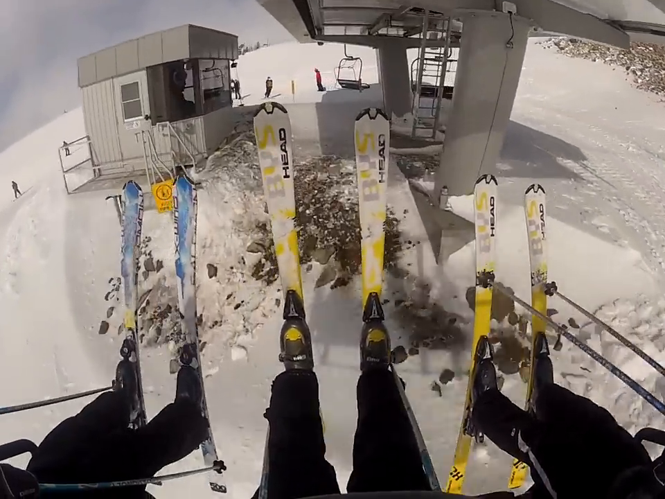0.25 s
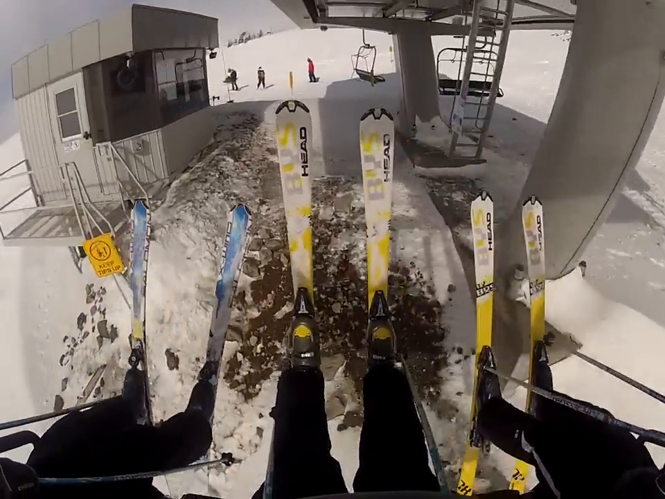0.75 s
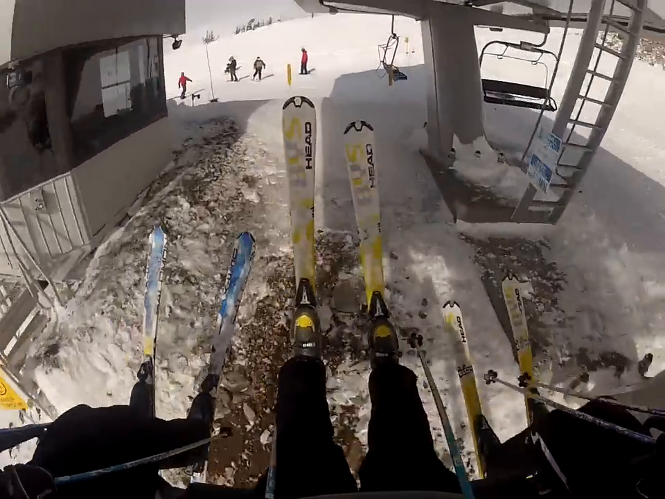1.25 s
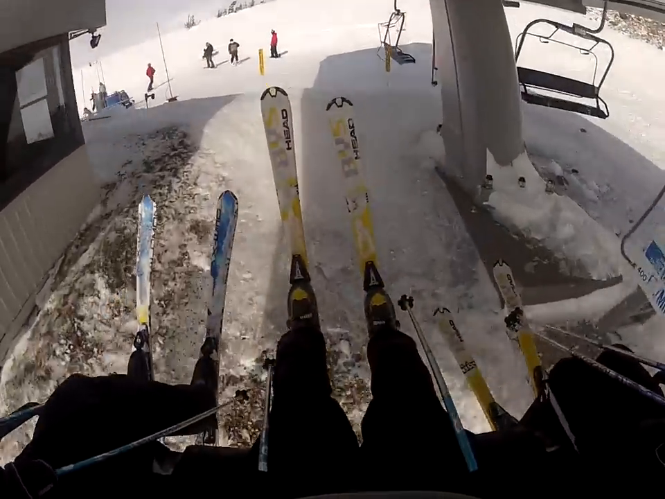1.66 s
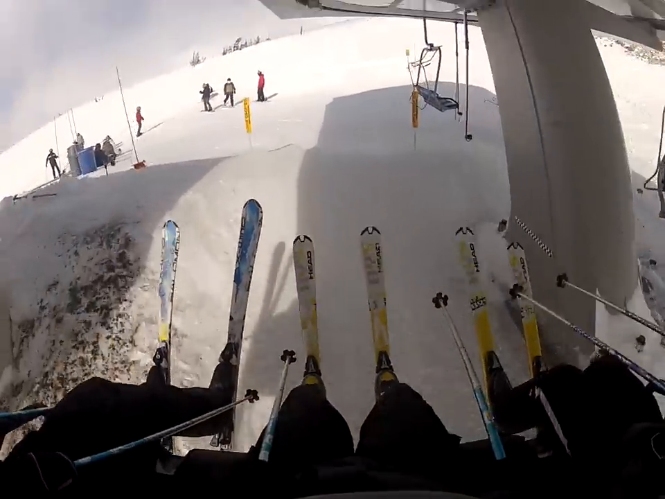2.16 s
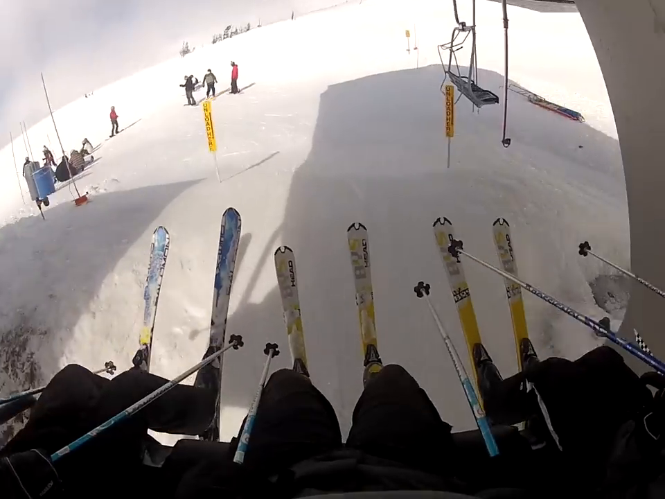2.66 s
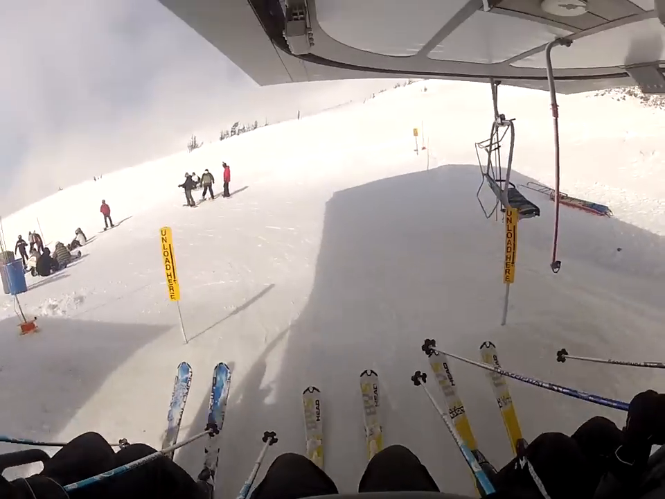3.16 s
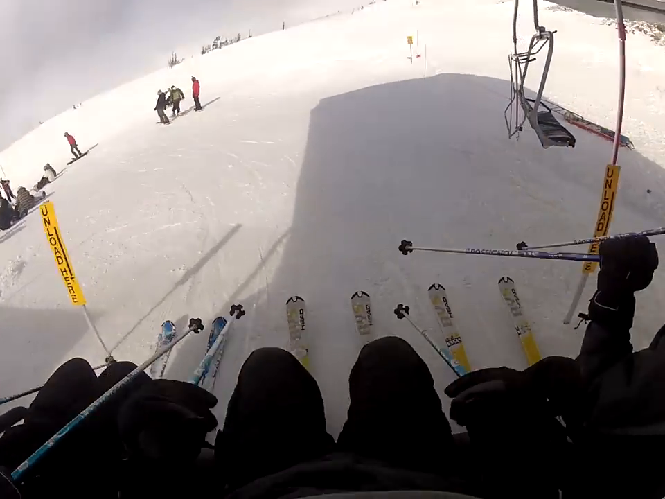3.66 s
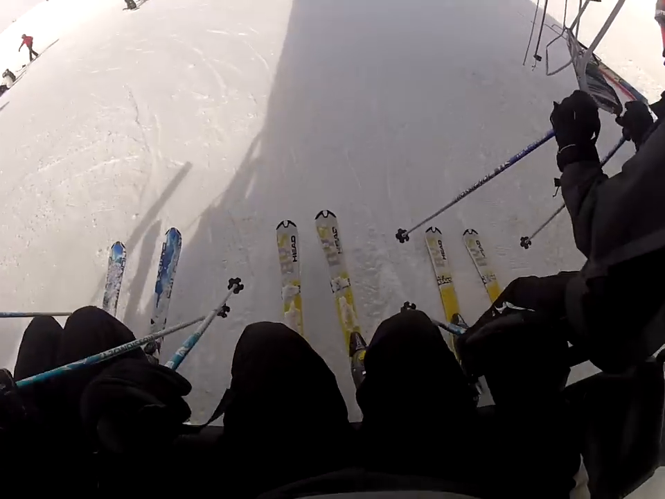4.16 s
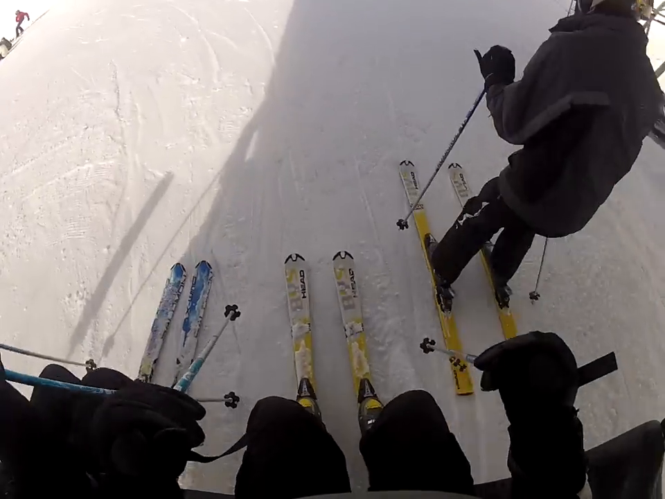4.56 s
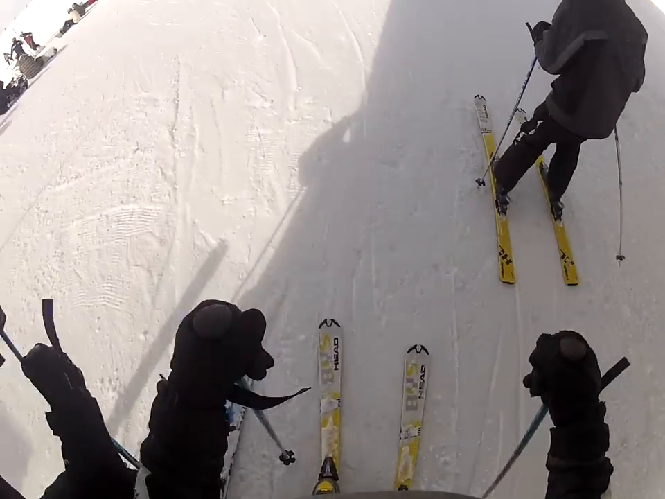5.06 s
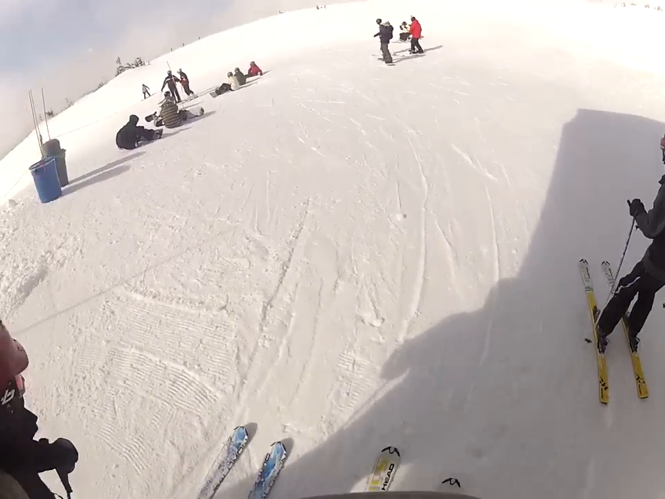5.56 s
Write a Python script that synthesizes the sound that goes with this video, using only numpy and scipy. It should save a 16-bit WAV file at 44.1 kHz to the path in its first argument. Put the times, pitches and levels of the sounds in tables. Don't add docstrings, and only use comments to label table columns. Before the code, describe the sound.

Heard from a rider's body camera in a closed case, a chairlift nears its top station. A low steady-pitched hum pulses over lumpy rumble; broadband machine roar opens abruptly before one second and stays. Brief cloth and pole scuffs follow. Sharp clacks with thumps come around 3.6 and 3.7 seconds, then at 5.0 and 5.3 as skis scrape snow. The sound is boxy, gritty and low-fidelity.

```python
import sys
import numpy as np
from scipy import signal
from scipy.io import wavfile
from scipy.ndimage import uniform_filter1d

SR = 44100
rng = np.random.default_rng(int(sys.argv[2]) if len(sys.argv) > 2 else 0)


def output_pcm(signal):
    pcm = np.clip(np.atleast_2d(signal).T, -1, 1) * 32767
    wavfile.write(sys.argv[1], SR, np.round(pcm).astype(np.int16))


def rack_gain(trim_db):
    fader = np.asarray(trim_db, float)
    return 10 ** (fader / 20)


N = 255780


def evened(x):
    return x / np.sqrt(np.mean(x ** 2) + 1e-20)


def steadied(x, window_s):
    size = round(window_s * SR)
    power = uniform_filter1d(uniform_filter1d(x ** 2, size), size)
    return x / np.sqrt(power + 1e-9)


def curve(rows, column=1):
    rows = np.vstack(rows)
    return np.interp(np.arange(N) / SR, rows[:, 0], rows[:, column])


def drift(rate_hz):
    size = max(int(SR / rate_hz), 2)
    return evened(uniform_filter1d(uniform_filter1d(rng.standard_normal(N), size), size))


def noise(colour, patchy_db, size=512):
    frames, hz = 4 * N // size + 5, np.fft.rfftfreq(size, 1 / SR)
    real, imag, patches = rng.standard_normal((frames, len(hz), 3)).T
    patches = uniform_filter1d(patches, size=4, axis=0)
    patches = evened(uniform_filter1d(patches, size=10, axis=1))
    f, db = np.transpose(colour)
    level_db = np.interp(np.log(hz + 1), np.log(f + 1), db, right=-90)[:, None]
    spectra = (real + 1j * imag) * rack_gain(level_db + patchy_db * patches)
    return evened(signal.istft(spectra, nperseg=size, noverlap=3 * size // 4)[1][:N])


def bandpass(x, band_hz):
    return signal.lfilter(*signal.butter(2, band_hz, "band", fs=SR), x)


def bump(t, centre_s, half_width_s):
    return np.exp(-((t - centre_s) / half_width_s) ** 2)


def add(mix, start_s, sound):
    part = mix[round(start_s * SR):][:len(sound)]
    part += sound[:len(part)]


# time in seconds, level in dB.
HUM = [(0.0, -32.5), (0.14, -32.5), (0.55, -25.5), (0.66, -33), (0.79, -26.5), (1.1, -25), (1.33, -21),
       (1.6, -26), (2.0, -30), (2.3, -31.5), (2.52, -21), (2.76, -26.5), (3.0, -18.5), (3.39, -19.5),
       (3.56, -14.5), (3.81, -24.5), (4.2, -32.5), (5.8, -30)]
# time in seconds, half width in seconds.
NODES = [(0.44, 0.057), (0.66, 0.043), (0.88, 0.08), (1.429, 0.17), (1.7, 0.13), (2.28, .07), (2.83, 0.11),
         (4.06, 0.067), (4.18, 0.064), (4.47, 0.058), (4.59, .08), (4.77, 0.064), (5.07, 0.078)]
# time in seconds, half width in seconds, peak in dB.
SWELLS = [
    [(4.36, .05, -35), (4.68, 0.017, -44), (5.26, 0.17, -27), (5.71, 0.2, -24.5)],
    [(0.18, 0.025, -46), (0.354, 0.037, -37), (0.75, 0.067, -44), (1.1, .1, -36), (1.4, 0.046, -46),
     (1.86, 0.09, -37), (2.45, 0.14, -37.5), (3.22, 0.16, -40), (3.48, .11, -34), (3.72, 0.047, -29),
     (4.1, .05, -43), (4.68, 0.33, -39.5), (5.19, 0.089, -36.5), (5.35, 0.039, -33), (5.65, 0.14, -40)],
    [(0.59, 0.13, -46), (0.93, 0.11, -43.5), (1.37, 0.035, -42), (1.57, 0.12, -34.5), (1.8, 0.045, -40),
     (2.16, 0.065, -43.5), (2.52, 0.13, -45), (3.03, 0.19, -43), (3.45, 0.18, -44.5), (4.1, .15, -51),
     (4.9, 0.08, -48.5), (5.55, 0.14, -51.5)],
]


def hum():
    mesh_hz, wander_hz, rest_db = 101.7, .35, [-75, -53, -57]
    t = np.arange(N) / SR
    turn = 2 * np.pi * np.cumsum(mesh_hz + wander_hz * drift(5.25)) / SR
    level = rack_gain(rest_db)[:, None] * np.ones(N)
    level[0] += rack_gain(curve(HUM))
    for s, half_width_s in NODES:
        level[0] *= np.tanh(abs(t - s) / half_width_s)
    for order_level, rows in zip(level, SWELLS):
        order_level += sum(rack_gain(db) * bump(t, s, half_width_s) for s, half_width_s, db in rows)
    out = np.zeros(N)
    for order, strength in enumerate(level, 1):
        flutter_db, sway_rad = .8 * drift(30), .08 * drift(20)
        out += np.sqrt(2) * strength * rack_gain(flutter_db) * np.sin(order * turn + sway_rad)
    return out


# time in seconds, level in dB, brightness of the upper part in dB.
RUMBLE = [(0.0, -41.5, 9.5), (0.33, -38.5, 0), (0.45, -38.5, 4.5), (0.5, -29, -6), (0.86, -31, -6.5),
          (1.02, -24.5, -7), (1.17, -23.5, -10.5), (1.23, -33, 1), (1.8, -32, -2), (2.27, -30.5, -3.5),
          (2.37, -39.5, 5), (2.5, -32, 0), (3.02, -36.5, 0), (3.2, -31, -5.5), (3.6, -30.5, -6.5),
          (4.0, -32.5, -6), (5.15, -37, -6.5), (5.8, -44.5, 4)]
# frequency in Hz, level in dB.
RUMBLE_LOW = [(15, -37), (30, 0.5), (55, 1.5), (80, 0.5), (110, -11.5), (150, -45), (250, -69)]
RUMBLE_HIGH = [(60, -21.5), (100, 4), (140, 1.5), (180, -3.5), (260, -9.5), (360, -17.5), (480, -26.5),
               (700, -41.5)]
# time and half width in seconds, lower and upper part in dB.
JOLTS = [(0.07, 0.052, -5, -15), (0.18, 0.02, 4, 1), (0.3, 0.034, 7, 2.5), (0.41, 0.029, 0, -2.5),
         (0.65, 0.032, 0.5, -1), (0.72, 0.04, -1, -6), (0.95, .06, -2.5, -0.5), (1.08, .07, -0.5, 5),
         (1.19, 0.031, 3.5, 5.5), (1.42, 0.16, 3.5, -0.5), (2.1, .12, -3, 0.5), (2.38, 0.033, 10, 2.5),
         (2.5, 0.1, -1, -1), (2.86, 0.046, -4, -4), (3.17, 0.035, 6.5, -1.5), (3.33, .05, -5, 0),
         (5.6, 0.077, 0, 1.5), (3.42, 0.031, -3, 1), (4.08, 0.029, -10, 0), (4.3, 0.052, -4, 1.5),
         (4.82, 0.084, 1, 4.5), (5.25, .03, -5, 2)]


def rumble():
    t = np.arange(N) / SR
    low_db, high_db = sum(np.outer(db, bump(t, s, half_width_s)) for s, half_width_s, *db in JOLTS)
    low_db = low_db + 1.25 * drift(36)
    high_db = high_db + curve(RUMBLE, 2) + 3.5 + 0.84 * drift(34)
    low = steadied(noise(RUMBLE_LOW, patchy_db=1.7, size=4096), 0.077) * rack_gain(low_db)
    high = steadied(noise(RUMBLE_HIGH, patchy_db=1.17, size=4096), 0.09) * rack_gain(high_db)
    return rack_gain(curve(RUMBLE)) * (low + high)


# frequency in Hz, level in dB.
FLOOR_COLOUR = [(210, -14), (350, -4), (408, -10), (461, -32), (589, -12.5), (950, -11), (1090, -46), (1520, -16.5),
                (1750, -29), (1960, -10.5), (2100, -12.5), (2310, -14), (2740, -19.5), (3500, -20.5), (4000, -18),
                (5200, -76), (8800, -120)]


def noise_floor():
    return rack_gain(-55.5) * noise(FLOOR_COLOUR, patchy_db=-1.2)


# frequency in Hz, width in Hz, level in dB.
CASE = [(934, 103, 11.5), (1384, 510, 10), (2084, 195, 14), (2950, 78, 10.5), (3440, 640, 9.5),
        (1085, 110, -17), (1730, 150, -28), (696, 150, -1.5)]


def through_case(x):
    out = x.copy()
    for hz, width_hz, db in CASE:
        out += (rack_gain(db) - 1) * signal.lfilter(*signal.iirpeak(hz, hz / width_hz, SR), x)
    return evened(out)


# time in seconds, level in dB.
ROAR = [(0.0, -63), (0.3, -60), (0.74, -58.5), (0.76, -46), (0.95, -49.5), (1.04, -45), (1.14, -48),
        (1.9, -45.5), (2.03, -43.5), (2.15, -45), (2.7, -48.5), (3.25, -48), (3.7, -51), (4.43, -54.5),
        (4.74, -51.5), (5.0, -53), (5.45, -51.5), (5.8, -50)]
# frequency in Hz, level in dB.
ROAR_TILT = [(200, -7), (400, 1.5), (700, 0.5), (1100, -5), (1700, -6.5), (2400, -8), (3200, -17.5),
             (3750, -15), (4000, -7.5)]


def roar():
    ticks_per_s = 60
    tick_db = 3.5 * np.minimum(rng.exponential(1, N), 3)
    ticks = (rng.random(N) < ticks_per_s / SR) * rack_gain(tick_db)
    rattle = 1 + 0.18 * signal.lfilter([1], [1, -.995], ticks)
    wash = noise(ROAR_TILT, patchy_db=1.5) * rattle * rack_gain(0.26 * drift(35))
    return rack_gain(curve(ROAR) + 0.99) * through_case(wash)


# start in seconds, peak in dB, frequency in Hz, t60 in seconds, rise in seconds.
THUMPS = [(0.159, -22.5, 190, 0.19, 0.0073), (.578, -13.5, 155, 0.045, 0.0031),
          (3.563, -22.5, 210, .02, 0.00074), (3.5826, -16.5, 204, 0.017, 0.00047),
          (3.728, -4, 58, 0.096, 0.0036), (5.0118, -1, 76.3, 0.071, 0.0044),
          (5.012, -20, 363, 0.0077, 0.00041), (5.343, -26, 346, .014, .0008),
          (5.048, -10.5, 79, 0.06, 0.0051), (5.063, -10, 62.3, 0.076, 0.0035),
          (5.345, -4, 71, 0.065, 0.003)]


def thumps():
    out, t = np.zeros(N), np.arange(9000) / SR
    sag_s = 0.0053 * (1 - np.exp(-t / 0.0062))
    for s, peak_db, hz, t60_s, rise_s in THUMPS:
        shape = rack_gain(peak_db - 60 * t / t60_s) * (1 - np.exp(-t / rise_s))
        add(out, s, 1.27 * shape * np.sin(2 * np.pi * hz * (t + sag_s)))
    return out


# start and length in seconds, level, 1.4 kHz and 3 kHz band in dB.
SCUFFS = [(0.266, 0.051, -53, -16, -8), (0.755, 0.013, -39, -2, -8), (0.763, 0.025, -37.5, -25, -11),
          (0.793, 0.014, -41, -5, 0), (0.828, 0.019, -38.5, -4, -5.5), (.76, 0.14, -50, -14, 0),
          (1.005, .02, -53, 7, -14), (1.021, 0.034, -50, 6, -13), (1.083, 0.055, -41.5, -18, -11),
          (2.971, 0.018, -53.5, 8, -16), (4.618, 0.024, -52, -9, -6), (4.671, 0.017, -49, 0.5, -12),
          (4.713, 0.044, -51.5, -1, -2), (4.884, 0.024, -54, 3, -9), (5.44, 0.028, -55, 4, -10)]
# low edge in Hz, high edge in Hz.
SCUFF_BANDS_HZ = [(360, 530), (1200, 1600), (1980, 2260), (2400, 3800)]


def scuffs():
    out, t = np.zeros(N), np.arange(4000) / SR
    for s, length_s, db, mid_db, high_db in SCUFFS:
        grain, grip = rng.standard_normal((2, 4000))
        shape = (1 - np.exp(-t / 0.0026)) * np.exp(-(t / length_s) ** 3)
        drag = grain * rack_gain(2.3 * evened(uniform_filter1d(grip, size=120)))
        bands = zip((-2.5, mid_db, -2.5, high_db), SCUFF_BANDS_HZ)
        burst = sum(rack_gain(band_db) * evened(bandpass(drag, band_hz)) for band_db, band_hz in bands)
        add(out, s, rack_gain(db) * shape * burst)
    return out


# start in seconds, length in seconds, level in dB.
SCRAPE = [(0.27, 0.025, -55.5), (0.85, .6, -69), (1.523, 0.019, -56), (1.45, 1.5, -64.5),
          (2.974, 0.56, -59.5), (3.62, 0.125, -59), (3.75, 2.1, -63), (4.682, 0.066, -52.5),
          (4.876, 0.035, -62), (5.021, .225, -51), (5.286, 0.18, -49), (5.478, 0.19, -57), (5.654, .2, -63)]
# frequency in Hz, level in dB.
SCRAPE_COLOUR = [(600, -23), (1500, -18.5), (2100, -4), (2700, -15.5), (3200, -17), (3520, -1.5),
                 (3780, -9), (4000, -8)]


def scrape():
    t, ramp_s = np.arange(N) / SR, 0.039
    chatter = rack_gain(0.36 * drift(180) + 0.5 * drift(36))
    drags = np.zeros(N)
    for s, length_s, db in SCRAPE:
        inside_s = np.minimum(t - s, s + length_s - t)
        drags += rack_gain(db) * np.clip(inside_s / ramp_s + .5, 0, 1)
    return rack_gain(0.5) * drags * evened(noise(SCRAPE_COLOUR, patchy_db=-1.8) * chatter)


# start in seconds, then 0.9 kHz mode, 1.3 kHz mode, 2 kHz pair, 3.5 kHz mode in dB.
CLACKS = [
    (3.5642, -29, -21, -22.5, -27),
    (3.5832, -14.5, -10.5, -16, -37),
    (3.5879, -34, -42, -29, -50),
    (3.7265, -36, -21.5, -25.5, -34),
    (3.911, -56, -25, -34.5, -48),
    (3.954, -39, -36, -48, -56),
    (5.0115, -24.5, -13, -16, -16),
    (5.016, -48, -43, -28, -50),
    (5.3434, -27, -15.5, -20, -19),
]
# frequencies in Hz, t60 in seconds.
CLACK_MODES = [([905], .025), ([1330], .010), ([1800, 2290], .011), ([3560], .011)]


def clacks():
    ring_factor, damping_power = 0.76, 1.63
    out, t = np.zeros(N), np.arange(2500) / SR
    for s, *modes_db in CLACKS:
        rattle = rack_gain(max(modes_db) - 14 - 60 * t / 0.036) * rng.standard_normal(len(t))
        sound = bandpass(rattle, (400, 3400))
        side = 1
        for db, (pair_hz, t60_s) in zip(modes_db, CLACK_MODES):
            decay = rack_gain(db - 2 - 60 * (t / (t60_s * ring_factor)) ** damping_power)
            for hz in pair_hz:
                side = -side
                sound += side * decay * np.sin(2 * np.pi * hz * rng.uniform(0.93, 1.02) * t)
        snap = rack_gain(max(modes_db) + 6 - 60 * t / 0.004) * np.cos(2 * np.pi * 1600 * t)
        add(out, s, (sound + snap) * (1 - np.exp(-t / 0.00088)))
    return out


def scene():
    machinery = hum() + rumble() + noise_floor() + roar()
    rider = thumps() + scuffs() + scrape() + clacks()
    return (machinery + rider)[None]


def roll_off(x):
    return signal.sosfilt(signal.butter(12, 16520, fs=SR, output="sos"), x)


def record(dry):
    stored_hz, held, edge_hz = 8000, 6, 15300
    smooth = signal.sosfilt(signal.cheby2(8, 21, 4000, fs=SR, output="sos"), dry)
    stored = signal.resample_poly(smooth, stored_hz, SR, axis=1, window=("kaiser", 8))
    stairs = np.repeat(stored, held, axis=1)
    played = signal.resample_poly(stairs, SR, stored_hz * held, axis=1)[:, :N]
    lowpass = signal.firwin(1023, edge_hz, window=("kaiser", 10), fs=SR)
    kept = signal.oaconvolve(played, lowpass[None], "same")
    treble = bandpass(played, (9000, 14000))
    attack = uniform_filter1d(treble ** 2, size=256) > rack_gain(-46) ** 2
    top = signal.sosfilt(signal.cheby2(10, 30, 16800, fs=SR, output="sos"), played - kept)
    kept += rack_gain(-7) * top * uniform_filter1d(1. * attack, size=128)
    return roll_off(kept)


dry = scene()
out = record(dry)
output_pcm(out)
```